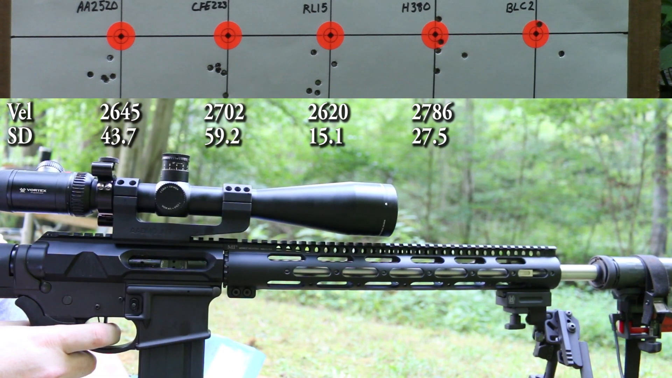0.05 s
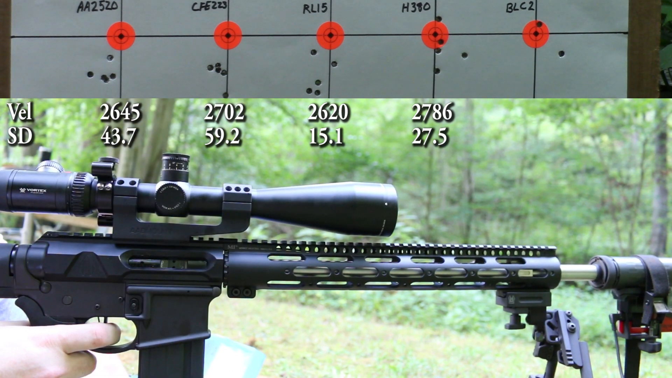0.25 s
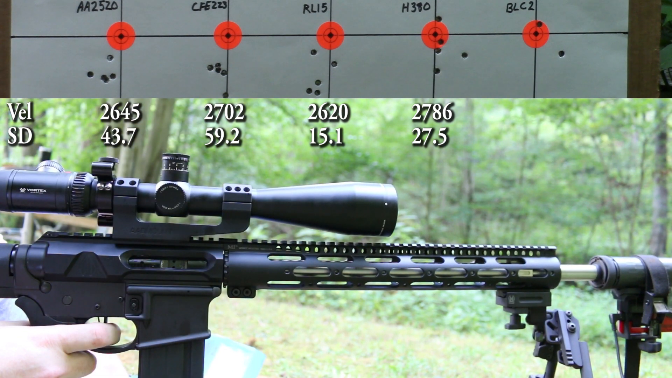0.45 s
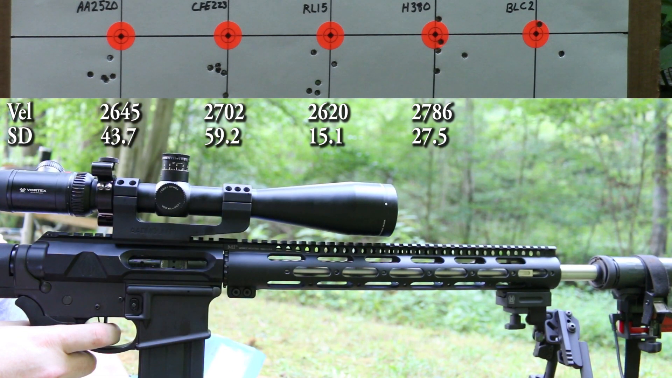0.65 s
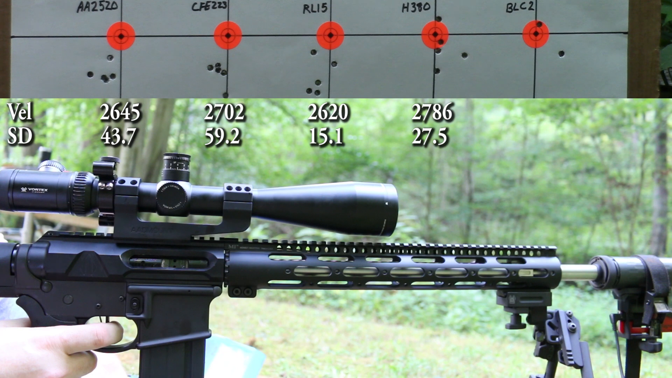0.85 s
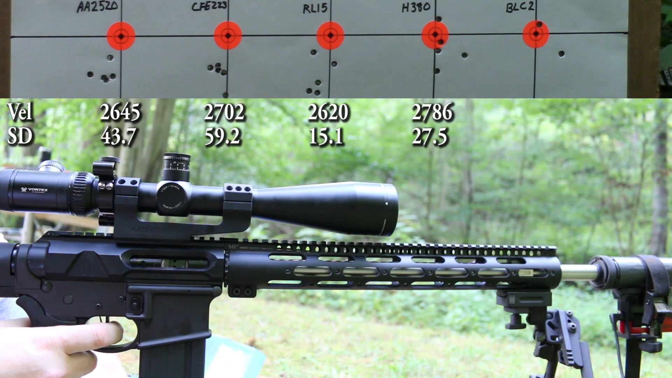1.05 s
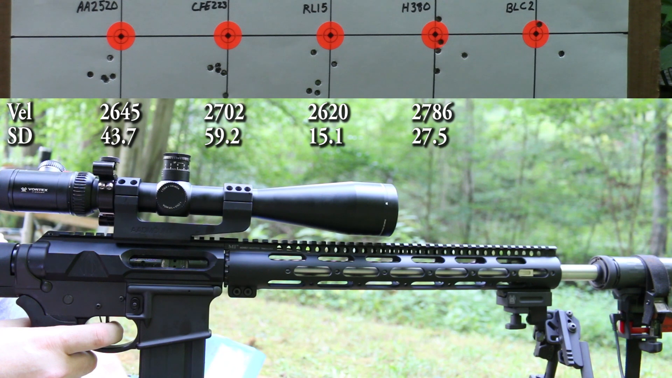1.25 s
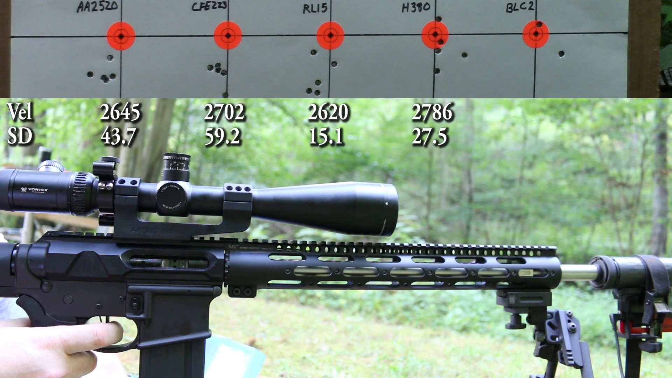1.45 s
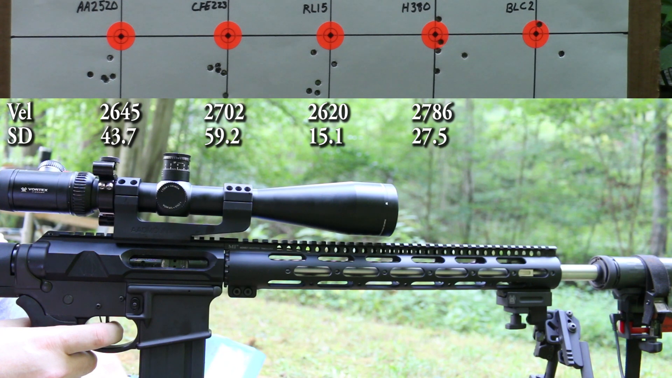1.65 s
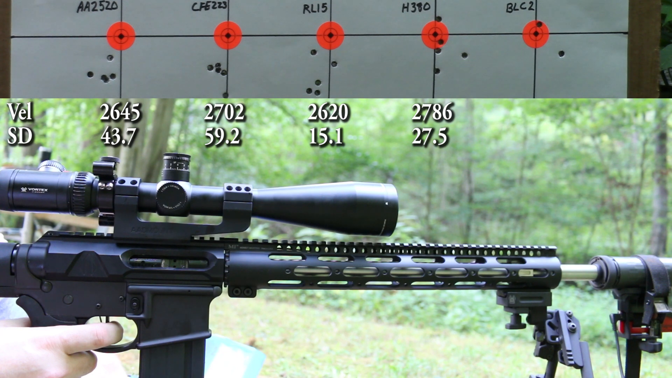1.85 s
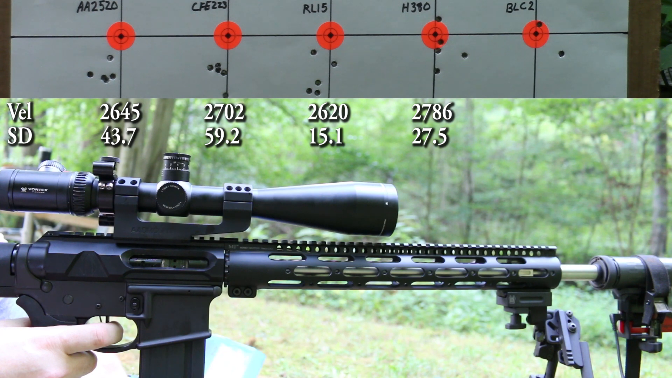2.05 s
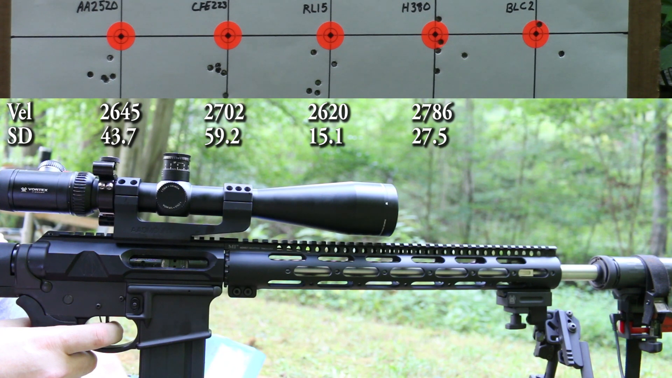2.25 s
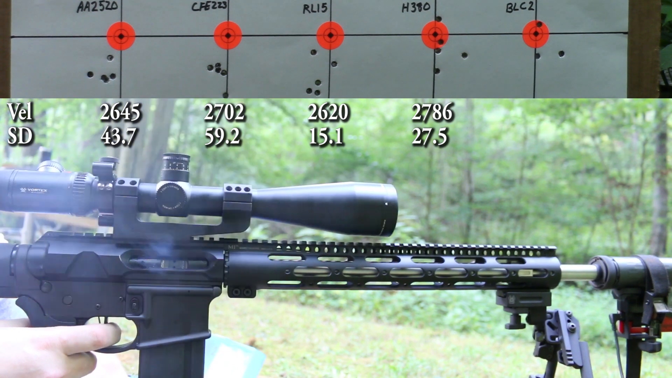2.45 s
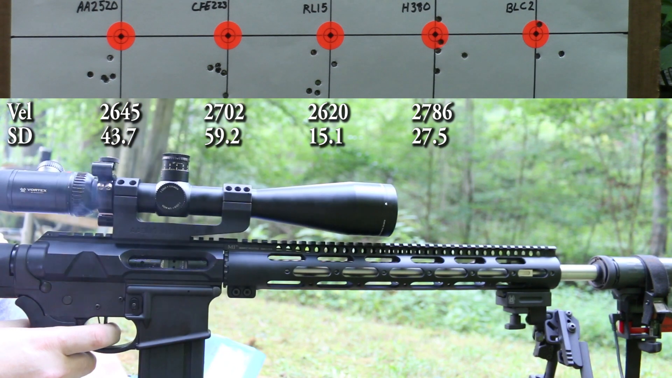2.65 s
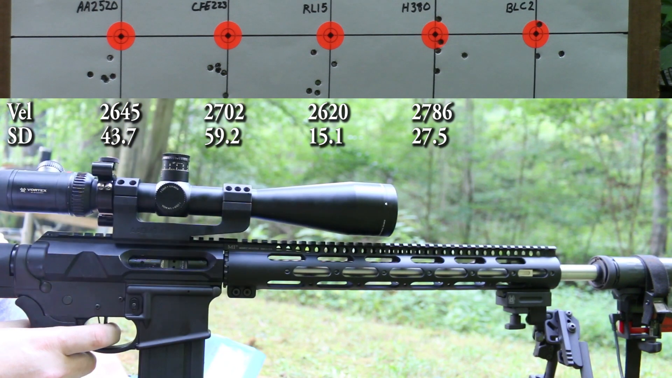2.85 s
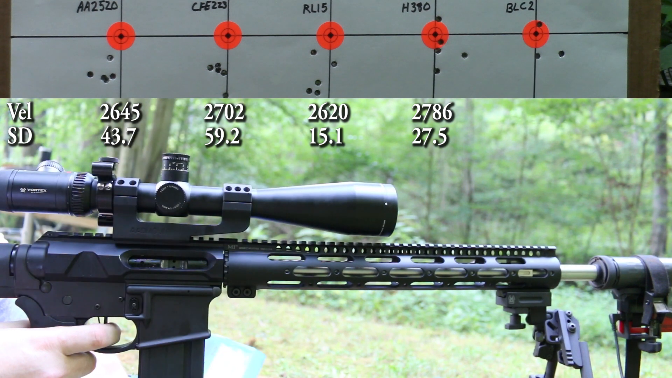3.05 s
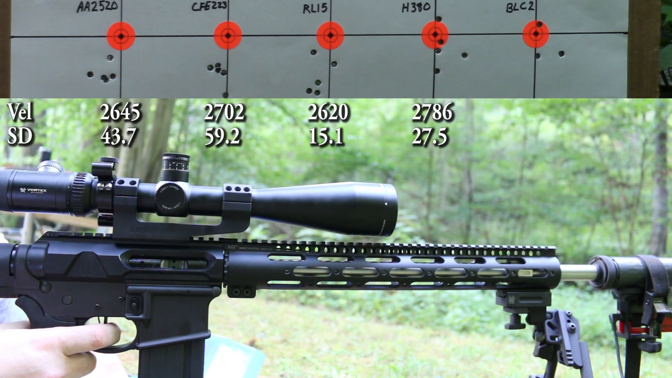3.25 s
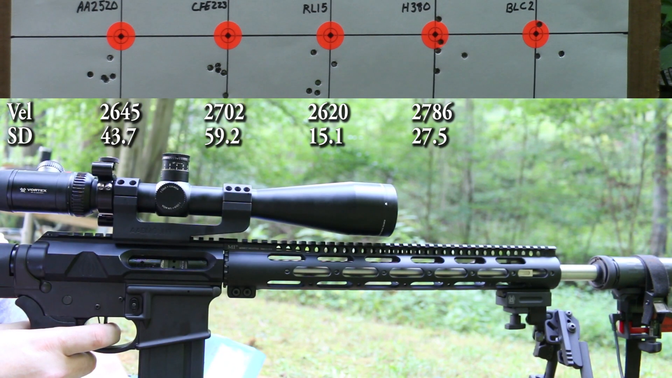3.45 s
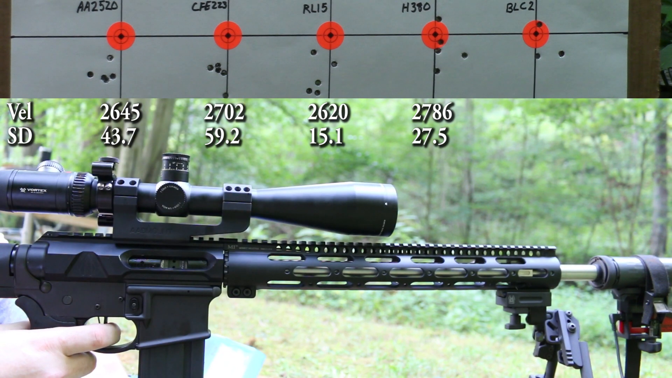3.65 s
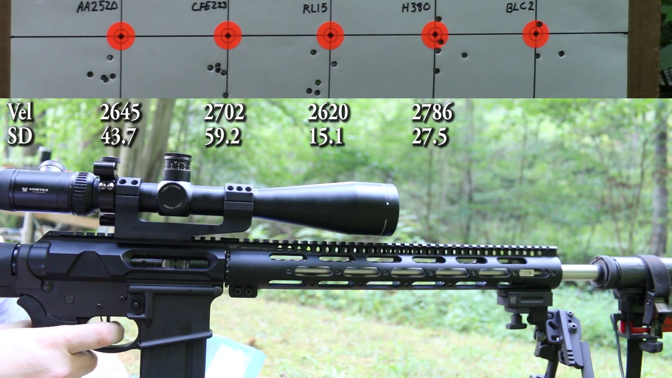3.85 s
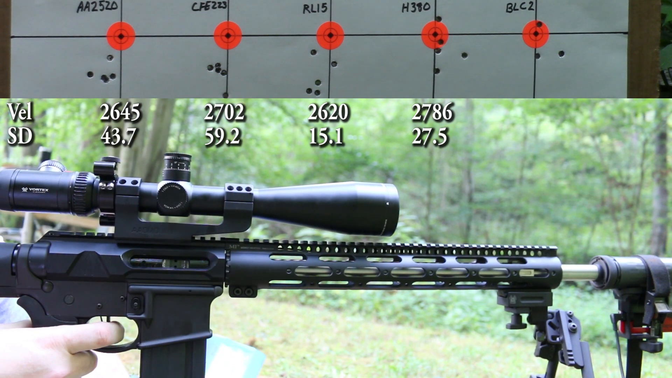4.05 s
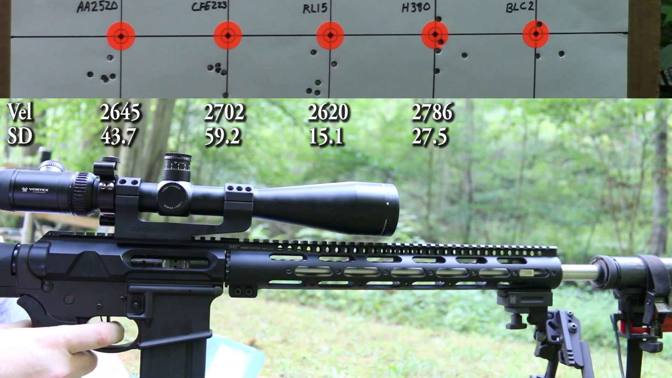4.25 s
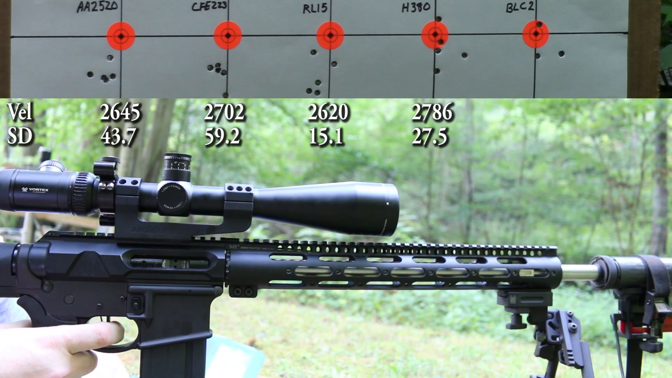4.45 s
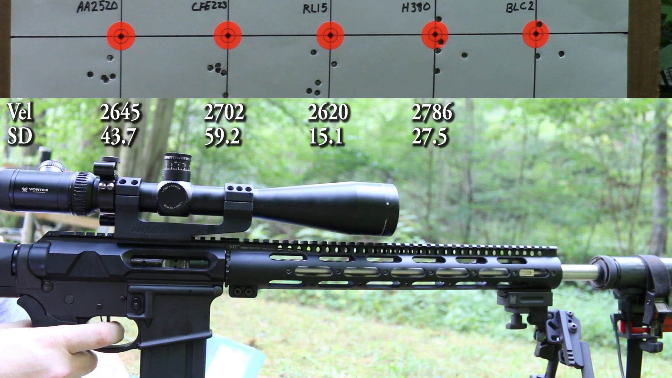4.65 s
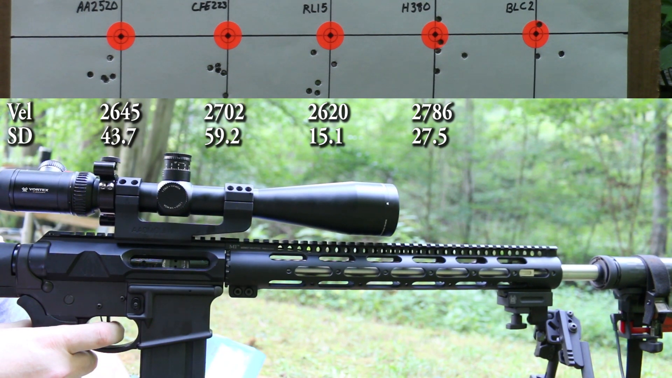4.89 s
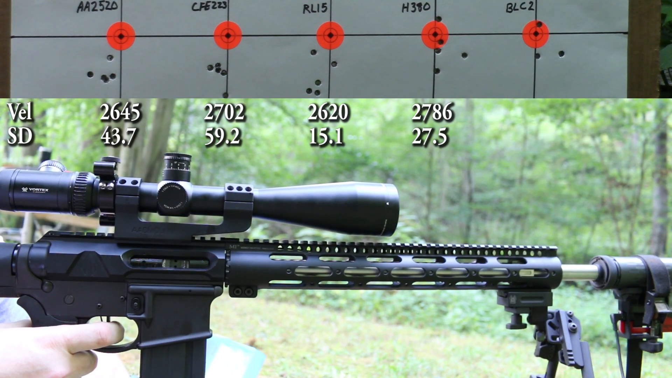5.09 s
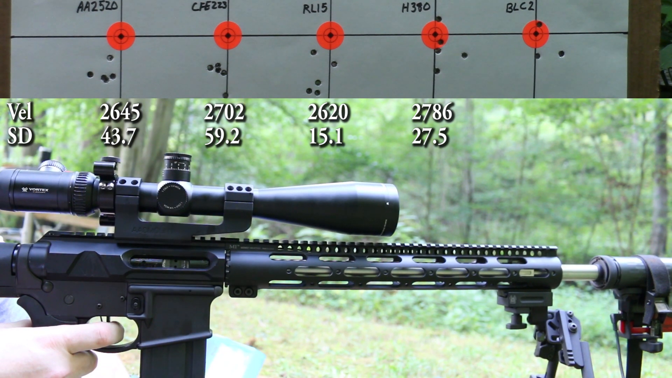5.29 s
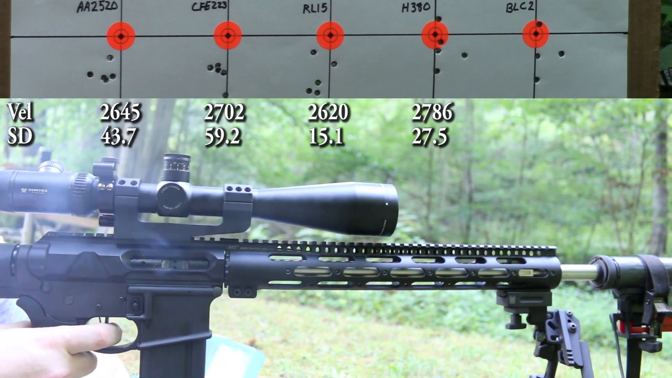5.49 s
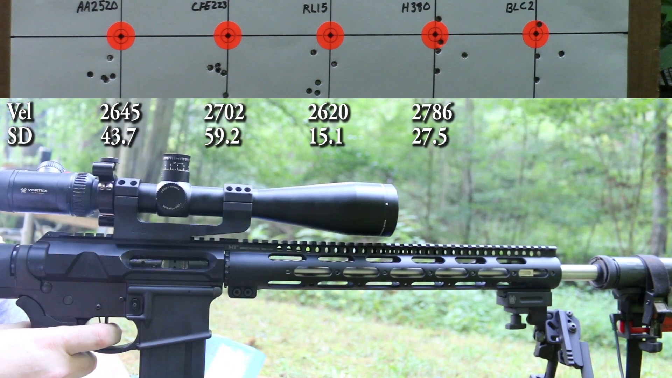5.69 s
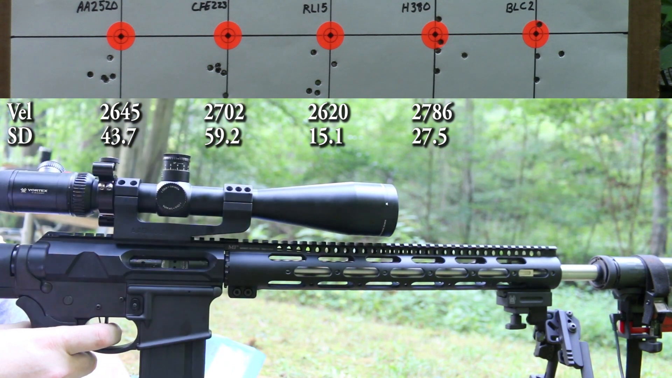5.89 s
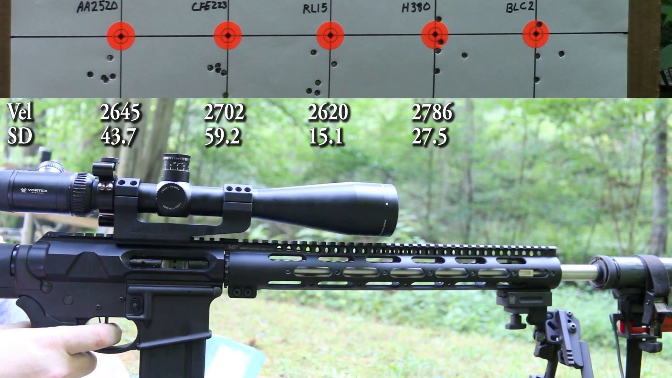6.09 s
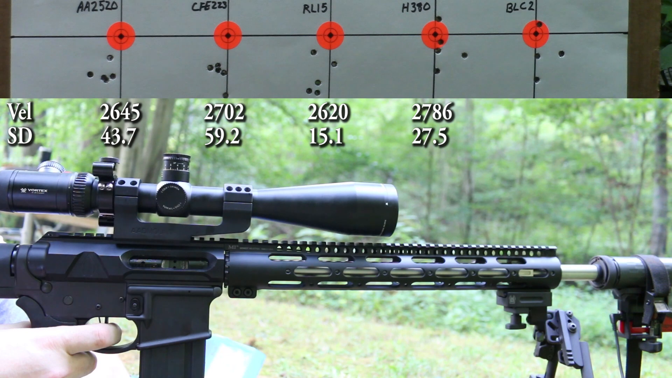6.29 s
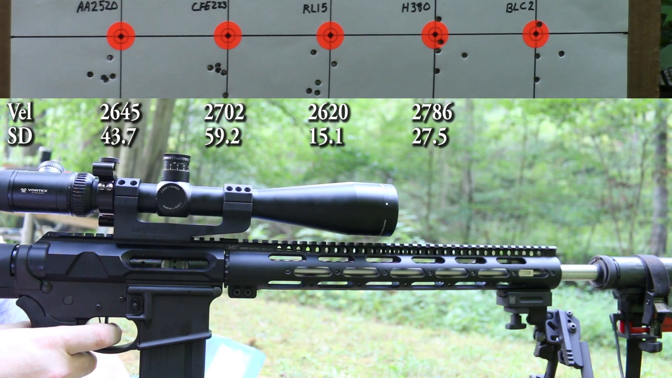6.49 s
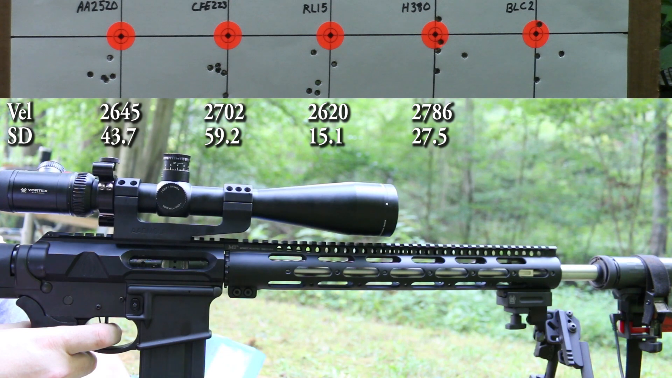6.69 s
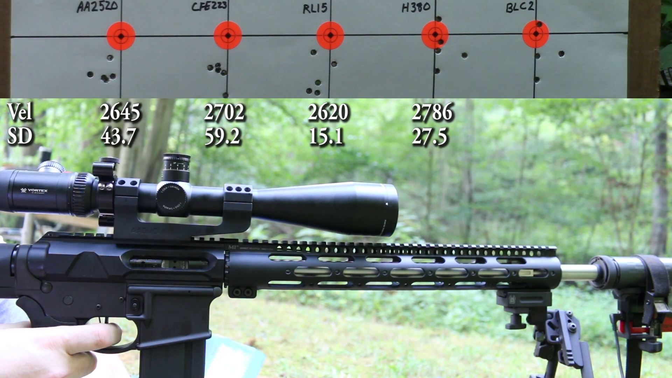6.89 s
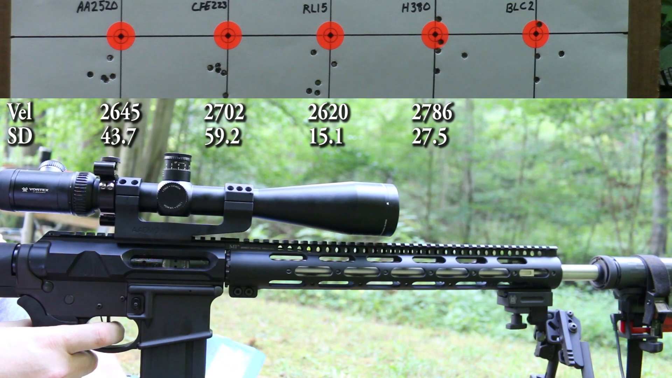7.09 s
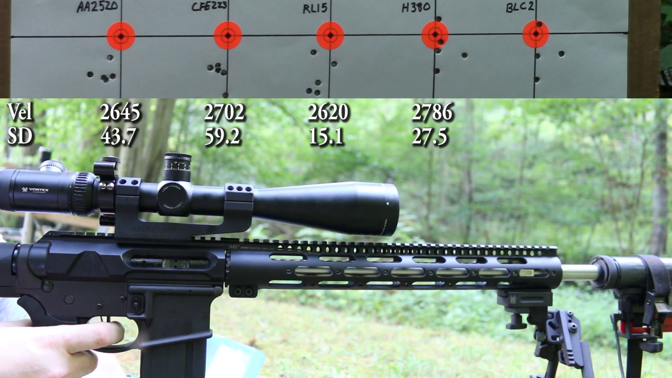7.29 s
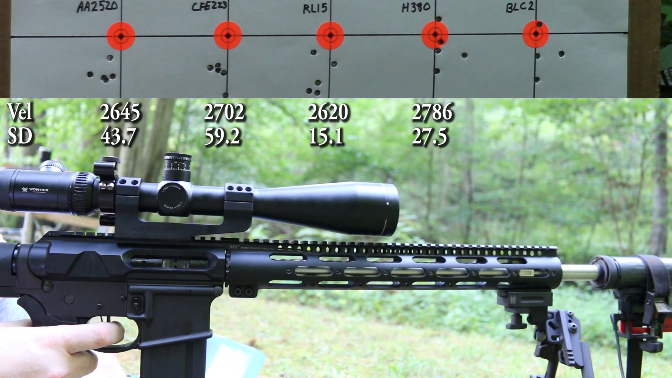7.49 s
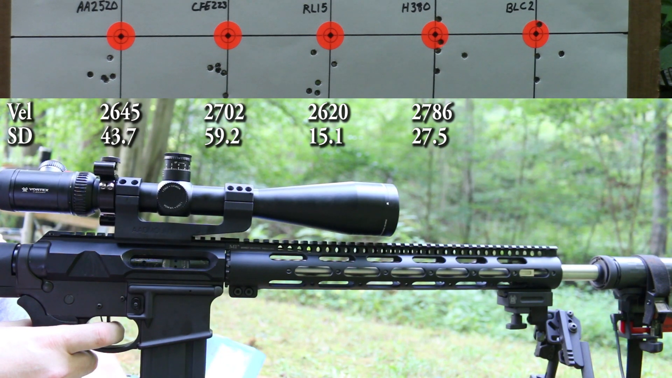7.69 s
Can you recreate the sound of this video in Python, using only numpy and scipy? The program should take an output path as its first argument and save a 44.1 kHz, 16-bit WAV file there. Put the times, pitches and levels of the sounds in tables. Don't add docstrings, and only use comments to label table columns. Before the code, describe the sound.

A small close microphone is overloaded by a semi-automatic rifle in the woods. First only a dying echo tail, abruptly ended, then quiet insect hiss, a low far engine and a thin upward bird whistle. A crack bursts out, the bolt slams at once, the woods hiss and boom back, and the case clinks and drops on soil. It repeats three seconds later, with a harder case bounce; the last echo is also cut.

```python
import sys
import numpy as np
from scipy import signal
from scipy.fft import rfft, irfft, next_fast_len
from scipy.io import wavfile
from scipy.ndimage import map_coordinates

SR = 44100
rng = np.random.default_rng(int(sys.argv[2]) if len(sys.argv) > 2 else 0)


def voltage_ratio(decibels):
    exponent = np.asarray(decibels, float) / 20
    return 10 ** exponent


def store_pcm(level_fs):
    pcm = np.round(np.clip(level_fs, -1, 1) * 32767).astype(np.int16)
    wavfile.write(sys.argv[1], SR, np.atleast_2d(pcm).T)


N = 340893
TIME = np.arange(N) / SR

# [t/s, level/dB, t/s of the scene change that ends the tail]
SHOTS = [
    (-1.07, 0, .789),
    (2.3885, 0, 3.923),
    (5.4168, 0, 7.093),
]


def unit(x):
    return x / np.sqrt(np.mean(x ** 2) + 1e-20)


def along(points, hz):
    f, v = np.transpose(points)
    return np.interp(np.log(hz + 1), np.log(f + 1), v)


def wobble(rate):
    knots = rng.standard_normal(int(N * rate / SR) + 4)
    return map_coordinates(knots, [TIME * rate])


def filtered(x, response):
    m = next_fast_len(len(x) + 8192)
    hz = np.fft.rfftfreq(m, 1 / SR)
    return irfft(rfft(x, m) * response(hz), m)[:len(x)]


def colored_noise(spectrum):
    return unit(filtered(rng.standard_normal(N), lambda hz: voltage_ratio(along(spectrum, hz))))


def resonance(f, hz, width):
    return 1j * f * width / (hz * hz - f * f + 1j * f * width)


def add(track, sound, s):
    i = round(s * SR)
    part = sound[max(-i, 0):][:len(track) - max(i, 0)]
    track[max(i, 0):][:len(part)] += part


def shock(t, hz):
    attack = np.clip(t / .0001, 0, 1)
    return np.cos(2 * np.pi * hz * t) * np.exp(-t * hz / .6) * attack * (t > 0)


def answer(belts, delay):
    power = 0
    for m, deep, db, t60 in belts:
        trip, swell = 2 * m / 343, 2 * deep / 343
        onset = np.clip((delay - trip) / swell + 1, 0, 1)
        power = power + onset * voltage_ratio(db - 60 * (delay - trip) / t60) ** 2
    return np.sqrt(power)


def scatter(spectrum, loss, pivot_s, delay, lumpy_db):
    echoes = rng.standard_normal(N) * voltage_ratio(lumpy_db * (wobble(25) + wobble(160)))
    echoes = unit(filtered(echoes, lambda hz: voltage_ratio(along(spectrum, hz))))
    hz, t, z = signal.stft(echoes, SR, nperseg=512)
    late = np.interp(t, TIME, delay) - pivot_s
    return signal.istft(z * voltage_ratio(along(loss, hz)[:, None] * late), SR, nperseg=512)[1][:N]


def woods():
    # [distance/m, depth/m, level/dB, t60/s]
    foliage_belts = [(0, .1, -10, .45), (11.5, 6, -14.5, .32), (0, .1, -14.5, 1.2)]
    wood_belts = [(0, .1, -22, .45), (30, 12, -40, 2), (105, 14, -48, 3.2)]
    ground_belts = [(0, .1, -22, .17), (0, .1, -41, 1.2), (100, 10, -71, 2.6)]
    # [f/Hz, level/dB per Hz]
    leaf_color = [(1100, -45), (1800, -20), (2500, -14), (3400, -9.5), (4800, -2.5), (6290, 0),
                  (7890, -4.5), (9500, -17.5), (11500, -33), (15700, -37)]
    trunk_color = [(76, -40), (130, -14), (200, -7), (280, -1), (420, 1), (560, -5), (835, -9), (1090, -13),
                   (1350, -6), (1780, -13), (2400, -13), (3600, -23), (6000, -80)]
    boom_color = [(12, -30), (25, -11), (50, -8), (100, -3), (170, -5), (260, -40)]
    # [f/Hz, level/dB per s]
    leaf_loss = [(1500, 18), (3000, 11), (4500, 4), (6000, 0), (10000, -9), (12500, -45), (16000, -75)]
    trunk_loss = [(150, -3), (400, 0), (800, 2), (1300, -5), (3500, -16)]

    delay, gain = np.zeros(N), np.zeros(N)
    for s, db, change in SHOTS:
        delay = np.where(TIME > s - .02, TIME - s, delay)
        onset = np.clip((TIME - s + .0008) / .0015, 0, 1)
        gain += voltage_ratio(db) * onset * np.clip((change - TIME) / .003, 0, 1)
    delay = np.clip(delay, 0, 2)
    leaves = scatter(leaf_color, leaf_loss, pivot_s=.17, delay=delay, lumpy_db=.7)
    trunks = scatter(trunk_color, trunk_loss, pivot_s=.85, delay=delay, lumpy_db=1.1)
    echoes = answer(foliage_belts, delay) * leaves
    echoes += answer(wood_belts, delay) * trunks
    echoes += answer(ground_belts, delay) * colored_noise(boom_color)
    return gain * echoes


def insects():
    # [f/Hz, level/dB per Hz]
    chorus_color = [(3060, -62), (5200, -32), (5480, -29), (5870, -17), (6390, -5), (7380, 1), (7760, -1),
                    (8130, -6), (8990, -33), (9500, -35), (12400, -65), (20900, -120)]
    shimmer_db = .5 * wobble(.7) + .6 * wobble(3) + .8 * wobble(22)
    return voltage_ratio(-69 + shimmer_db) * colored_noise(chorus_color)


def air():
    # [f/Hz, level/dB per Hz]
    air_color = [(12, -29), (20, 1), (44, -2), (80, -7), (130, -12), (300, -13), (420, -15), (600, -22),
                 (5200, -43), (6760, -73), (11400, -120)]
    gusts = voltage_ratio(-81 + 1.1 * wobble(5) + 2.2 * wobble(16)) * colored_noise(air_color)
    hiss = voltage_ratio(-90) * rng.standard_normal(N)
    return gusts + filtered(hiss, lambda hz: hz < 5600)


def engine():
    # [f/Hz, width/Hz, level/dB]
    hum = [(70, 25, 0), (117, 22, -1), (140, 20, -6), (234, 25, -12), (292, 18, -9)]
    # [f/Hz, rms level/dB]
    tones = [(118.4, -86), (290.7, -93)]

    def body(f):
        return sum(voltage_ratio(db) * resonance(f, hz, w) ** 2 for hz, w, db in hum)

    sound = voltage_ratio(-80) * unit(filtered(rng.standard_normal(N), body))
    for hz, db in tones:
        sound += voltage_ratio(db - 3 + 3 * wobble(6)) * np.sin(2 * np.pi * hz * TIME)
    return sound * (TIME < SHOTS[1][-1])


def bird():
    glide_s, hold_s, low_hz, high_hz = .41, .09, 3460, 4250
    t = TIME - .785
    rise = (1 - np.cos(np.pi * np.clip(t / glide_s, 0, 1))) / 2
    pitch = low_hz + (high_hz - low_hz) * rise + 25 * wobble(60)
    phase = 2 * np.pi * np.cumsum(pitch) / SR
    on = np.clip(t / .03, 0, 1) * np.clip((glide_s + hold_s - t) / .03, 0, 1)
    crescendo_db = 5 * rise ** 3
    beads_db = 3.5 * wobble(25)
    call = voltage_ratio(-94 + 3 + crescendo_db + beads_db) * on * np.sin(phase)
    tail = rng.standard_normal(SR) * voltage_ratio(-60 * TIME[:SR] / 1.3)
    return call + voltage_ratio(-3) * signal.fftconvolve(call, tail / np.linalg.norm(tail))[:N]


def lead_in():
    rattle = filtered(rng.standard_normal(round(.0058 * SR)), lambda hz: hz < 10300)
    return voltage_ratio(-46) * unit(rattle)


def flutter(t, delay, db, hz, count):
    pitches = hz * .82 ** np.arange(count)
    gaps = 1.1 / pitches
    starts = delay + np.cumsum(gaps) - gaps
    pulses = 0
    for k in range(count):
        swell_db = .5 * k + rng.normal(0, 1.5)
        pulses = pulses + voltage_ratio(db + swell_db) * shock(t - starts[k], pitches[k])
    return pulses


def blast():
    # [delay/s, level/dB, first f/Hz, number of pulses]
    returns = [
        (0, -2, 1250, 3),
        (.0038, -1, 520, 1),
        (.008, -8, 700, 1),
        (.0111, -4, 440, 3),
        (.019, -15, 400, 2),
        (.038, -11, 1000, 1),
        (.072, -18, 600, 1),
    ]
    t = np.arange(SR // 4) / SR
    shocks = sum(flutter(t, delay, db, hz, count=round(pulses)) for delay, db, hz, pulses in returns)
    howl = unit(filtered(rng.standard_normal(len(t)), lambda f: resonance(f, 6500, 1900) ** 2))
    howl *= np.clip(t / .002, 0, 1) * np.clip((.023 - t) / .007, 0, 1)
    heave = np.sin(2 * np.pi * 33 * (t - .004)) * (t > .004) * np.exp(-t / .022)
    return voltage_ratio(4) * shocks + voltage_ratio(-4) * howl + voltage_ratio(-12) * heave


def shots():
    track = np.zeros(N)
    for s, db, _ in SHOTS:
        add(track, lead_in(), s - .0058)
        add(track, voltage_ratio(db) * blast(), s)
    return track


def knock(db, thud_db, t60):
    t = np.arange(SR // 8) / SR
    burst = rng.standard_normal(len(t)) * voltage_ratio(-60 * t / t60) * np.clip(t / .0008, 0, 1)
    rattle = 4 * filtered(burst, lambda f: resonance(f, 6400, 1700) ** 3
                          + .008 * resonance(f, 13200, 400) ** 3)
    crack = rng.standard_normal(len(t)) * voltage_ratio(1.5 * db - 5 - 60 * t / .02)
    crack = filtered(crack, lambda f: 1 / (1 + 1j * f / 3500))
    pitch = 1 + db / 90
    thud = shock(t, 450 * pitch) - shock(t - .0011 / pitch, 600 * pitch)
    thud = filtered(thud, lambda f: 1 / (1 + 1j * f / 1800) ** 2)
    return voltage_ratio(db - 6) * (rattle + crack + voltage_ratio(thud_db + 8) * thud)


def bolt():
    track = np.zeros(N)
    for s, db, _ in SHOTS:
        if s > 0:
            add(track, knock(db + 2.5, thud_db=-17, t60=.095), s + .0912)
    return track


def case():
    # [t/s, peak level/dB, thud level/dB]
    landings = [
        (3.022, -33, -10),
        (3.09, -52, 11),
        (5.945, -33, -14),
        (6.0352, -22, -18),
        (6.118, -50, 12),
    ]
    track = np.zeros(N)
    for s, db, thud_db in landings:
        add(track, knock(db, thud_db, t60=.02), s)
    return track


def scene():
    ambience = insects() + air() + engine() + bird()
    return (woods() + ambience + shots() + bolt() + case())[None]


def low_pass(x):
    return signal.sosfilt(signal.butter(12, 17070, fs=SR, output="sos"), x)


def record(dry):
    flat = dry[0] / (1 + np.abs(dry[0] / .49) ** 6) ** (1 / 6)
    kept = filtered(flat, lambda hz: 1 / (1 + (hz / 15750) ** 160) / np.sqrt(1 + (hz / 14000) ** 4))
    return low_pass(kept[None])


dry = scene()
out = record(dry)
store_pcm(out)
```